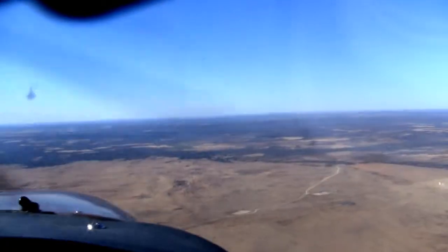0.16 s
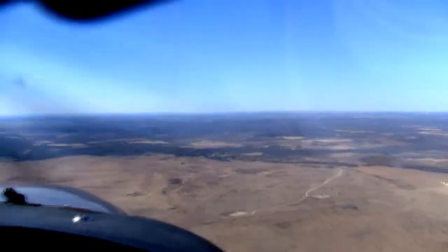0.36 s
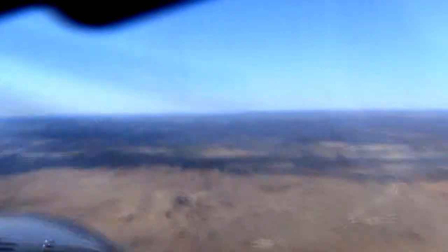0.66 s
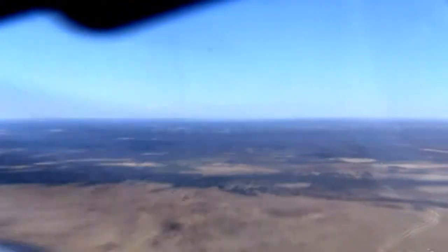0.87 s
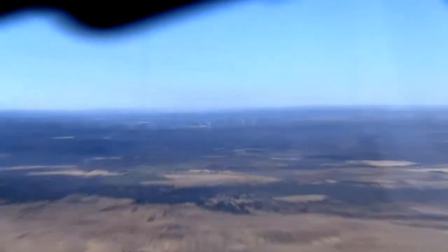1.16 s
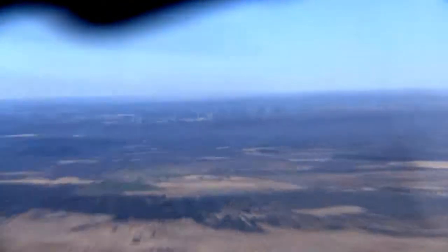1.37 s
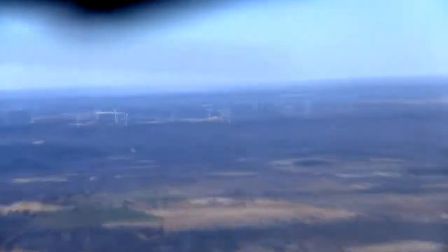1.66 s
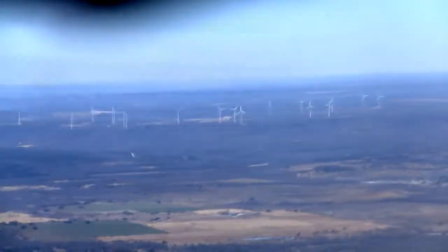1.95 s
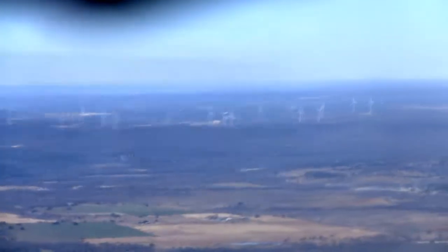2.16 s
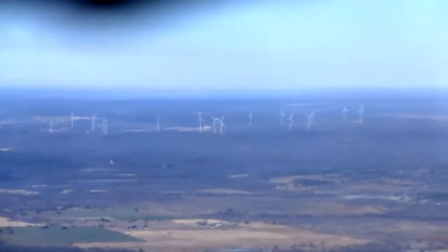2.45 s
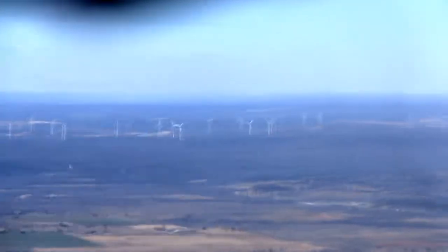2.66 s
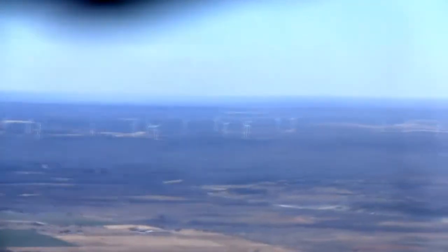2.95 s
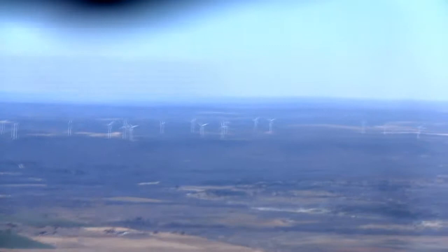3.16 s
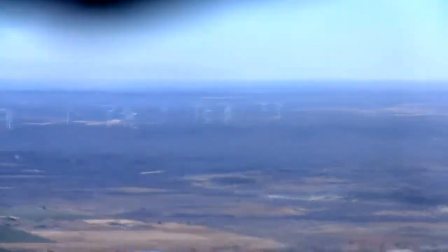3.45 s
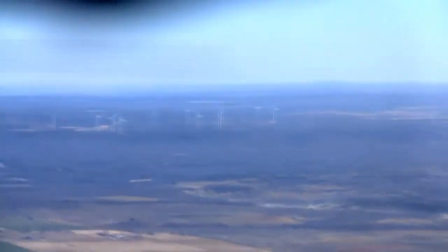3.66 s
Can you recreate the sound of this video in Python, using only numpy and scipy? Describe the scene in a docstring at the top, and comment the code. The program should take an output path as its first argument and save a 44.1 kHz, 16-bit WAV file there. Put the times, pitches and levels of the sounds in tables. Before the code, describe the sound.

A light aircraft's propeller and piston engine drone continuously from 0 to 3.8 seconds, a deep, bass-heavy hum near 77 Hz with slight wavering, leaning right in the cabin. Low airflow rumbles beneath. Nearer the centre are faint even hiss and a very thin, fluttering high electrical whine. Tiny sharp ticks come close together at the start, then near 1.0, 1.8, 2.2 and 3.0 seconds.

```python
"""Propeller blades and engine firings drone in the cabin of a light piston aircraft in cruise, mostly on the right.
The drone is sines locked to the shaft; the air that buffets the cabin is coloured noise under it.
Near the middle the intercom adds coloured hiss and faint steady sines, and the alternator a thin whine
that follows the engine speed and flutters once an engine cycle. A few short pulses make sharp electrical ticks."""
import sys
import numpy as np
from scipy import signal
from scipy.fft import rfft, irfft
from scipy.io import wavfile
from scipy.ndimage import uniform_filter1d

SR = 44100
rng = np.random.default_rng(int(sys.argv[2]) if len(sys.argv) > 2 else 0)


def int16_out(signal):
    """Quantize to a 16-bit WAV file."""
    q = np.round(np.clip(np.atleast_2d(signal).T, -1, 1) * 32767)
    wavfile.write(sys.argv[1], SR, q.astype(np.int16))


N = 167580

# Engine speed, as the pitch of the alternator. Each row: time in seconds, pitch in Hz.
ALTERNATOR_PITCH = [(0, 5049), (.5, 5041), (1.05, 5049), (1.4, 5051), (1.7, 5038), (1.95, 5028),
                    (2.35, 5011), (2.7, 5020), (3.0, 5038), (3.3, 5035), (3.55, 5053), (3.8, 5047)]
WHINE_CYCLES_PER_TURN = 130.35


def undb(db):
    """Decibels to gain."""
    return 10 ** (np.asarray(db) / 20)


def curve(rows):
    """Straight lines in time through (s, value) rows."""
    times_s, values = np.array(rows).T
    return np.interp(np.arange(N) / SR, times_s, values)


def walk(rate_hz):
    """Random steps, rate_hz a second, smoothed twice over one step and scaled to a spread of 1."""
    step = int(SR / rate_hz)
    levels = np.repeat(rng.standard_normal(N // step + 1), step)
    smooth = uniform_filter1d(uniform_filter1d(levels, step), step)[:N]
    return smooth / smooth.std()


def noise(colour):
    """Noise of rms 1 with a spectrum through (Hz, dB) points on a log frequency axis."""
    hz, db = np.array(colour).T
    f = np.maximum(np.fft.rfftfreq(N, 1 / SR), 1)
    gain = undb(np.interp(np.log(f), np.log(hz), db))
    x = irfft(rfft(rng.standard_normal(N)) * gain, N)
    return x / x.std()


def pan(x, left_over_right_db):
    """Make the left louder by left_over_right_db; the mean of the two gains stays 1."""
    gains = undb(np.array([[left_over_right_db], [-left_over_right_db]]) / 2)
    return x * gains / gains.mean()


def running_phase(hz):
    """Phase of a varying frequency, in radians."""
    return 2 * np.pi * np.cumsum(hz) / SR


def drone(shaft):
    """Blade passes and firings: a strong fundamental twice a turn, wavering overtones locked to the shaft."""
    # Level of the fundamental. Each row: time in seconds, rms level in dB.
    blade_level = [(0, -21.5), (.3, -22.5), (.62, -19.5), (.92, -23), (1.25, -21.5), (1.65, -22),
                   (2.1, -21.5), (2.55, -22.5), (2.95, -22), (3.35, -20.5), (3.55, -22), (3.8, -21.5)]
    # Overtones, as multiples of the shaft speed.
    orders = [4, 4.5, 6, 7, 8, 9, 10, 16.5, 19.5, 20, 20.5, 22]
    # Their rms levels in dB, in the same sequence.
    order_db = [-39, -43.5, -46.5, -55.5, -56.5, -58.5, -53, -73.5, -76, -70, -74, -70.5]
    # One more overtone swells and fades on its own. Each row: time in seconds, rms level in dB.
    swelling_level = [(0, -58.5), (.9, -65), (1.1, -55.5), (1.4, -58), (1.7, -63.5), (3.8, -61.5)]
    swelling_order = 14
    blade_waver_db, overtone_waver_db, shaft_jitter_rad = 0.6, 1.88, 0.0099  # rms

    shaft = shaft + shaft_jitter_rad * walk(14)
    out = undb(curve(blade_level) + blade_waver_db * walk(6.15)) * np.sin(2 * shaft)
    overtones = [*zip(orders, order_db), (swelling_order, curve(swelling_level))]
    for order, db in overtones:
        gain = undb(db + overtone_waver_db * walk(5.5))
        out = out + gain * np.sin(order * shaft + rng.uniform(0, 2 * np.pi))
    return np.sqrt(2) * out


def airflow():
    """Slipstream buffets the cabin shell: low coloured noise with a slightly wavering level."""
    # Air and structure rumble. Each row: frequency in Hz, relative density in dB per Hz.
    rumble = [(10, -22), (22, -8), (29, -4), (37, 3), (47, -3.5), (62, 2.5), (84, -4.5), (102, 0),
              (140, -9), (190, -12), (240, -18), (290, -23), (420, -24), (480, -27.5), (620, -31.5),
              (830, -35), (1150, -43.5), (2200, -60.5)]
    level_db, buffet_rms_db = -28.5, 0.22
    return noise(rumble) * undb(level_db + buffet_rms_db * walk(14))


def alternator(shaft):
    """A thin whine geared to the engine; its pitch flutters once in two shaft turns."""
    # Each row: time in seconds, rms level of the fundamental in dB.
    whine_level = [(0, -57), (.25, -61.5), (.58, -58), (.85, -58.5), (1.3, -59.5), (1.68, -62), (1.78, -56),
                   (1.9, -59), (2.4, -59), (2.9, -61), (3.1, -58), (3.4, -59), (3.8, -59)]
    # Levels of harmonics 1, 2, 3 in dB relative to the fundamental.
    harmonics_db = [0, -11, -32]
    flutter_peak_hz, wander_rms_hz = 7, 4

    flutter = flutter_peak_hz * np.sin(shaft / 2)
    phase = running_phase(curve(ALTERNATOR_PITCH) + flutter + wander_rms_hz * walk(40))
    tone = sum(undb(db) * np.sin(k * phase) for k, db in enumerate(harmonics_db, start=1))
    return np.sqrt(2) * undb(curve(whine_level)) * tone


def ticks():
    """Electrical ticks: one-sided rectangular pulses built as spectra, edges rounded, lows cut."""
    # Each row: time in seconds, height before filtering in dB, width in ms.
    pulses = [(.02195, -19.4, .06), (.0420, -19.2, .06), (.0431, -21.5, .16), (1.0059, -21.1, .062),
              (1.8294, -20.8, .062), (2.1818, -20.8, .064), (3.0118, -19.9, .064)]
    soft_hz, low_cut_hz = 17500, 250

    f = np.fft.rfftfreq(N, 1 / SR)
    spectrum = 0
    for time_s, height_db, width_ms in pulses:
        width_s = width_ms / 1000
        delay = np.exp(-2j * np.pi * f * time_s)
        spectrum = spectrum + undb(height_db) * width_s * SR * np.sinc(f * width_s) * delay
    rounding = 1 / (1 + (f / soft_hz) ** 2)
    low_cut = 1j * f / (1j * f + low_cut_hz)
    return irfft(spectrum * rounding * low_cut, N)


def intercom():
    """Even hiss, widened by a part of opposite sign in the two ears, with faint steady tones."""
    # Hiss common to both ears. Each row: frequency in Hz, relative density in dB per Hz.
    hiss_colour = [(200, 1), (900, -2), (1800, 2), (2800, -1), (5000, -1), (8000, -3), (12000, -5.5),
                   (15500, -9)]
    # Hiss that differs between the ears. Each row: frequency in Hz, relative density in dB per Hz.
    side_colour = [(300, 3), (1200, 6.5), (2400, 4), (4000, 0.5), (8000, -2), (12000, -6), (15500, -9)]
    # Steady electrical tones. Each row: frequency in Hz, rms level in dB.
    tone_rows = [(1185, -80), (1472, -73), (2370.7, -80), (3556, -78.5), (4742, -81.5), (8298, -83.5)]
    hiss_db, side_over_hiss_db = -53.5, -12.5

    t = np.arange(N) / SR
    tones = sum(np.sqrt(2) * undb(db) * np.sin(2 * np.pi * hz * t) for hz, db in tone_rows)
    side = undb(side_over_hiss_db) * noise(side_colour) * np.array([[1], [-1]])
    return undb(hiss_db) * (noise(hiss_colour) + side) + tones


def scene():
    """Cabin sound to the right, electrical sounds near the middle."""
    shaft = running_phase(curve(ALTERNATOR_PITCH) / WHINE_CYCLES_PER_TURN)
    cabin = pan(drone(shaft) + airflow(), -8)
    electrical = pan(intercom(), 1.5) + pan(alternator(shaft), 2.6) + pan(ticks(), 3.5)
    return cabin + electrical


def record(dry):
    """Fade both ends to avoid clicks; the recorder cuts the top steeply."""
    edge_s, top_hz = .006, 15750
    t = np.arange(N) / SR
    ramp = np.minimum(np.minimum(t, t[::-1]) / edge_s, 1)
    edges = np.sin(np.pi / 2 * ramp) ** 2
    top_cut = signal.ellip(12, .05, 60, top_hz, fs=SR, output="sos")
    return signal.sosfiltfilt(top_cut, dry * edges)


dry = scene()
out = record(dry)
int16_out(out)
```